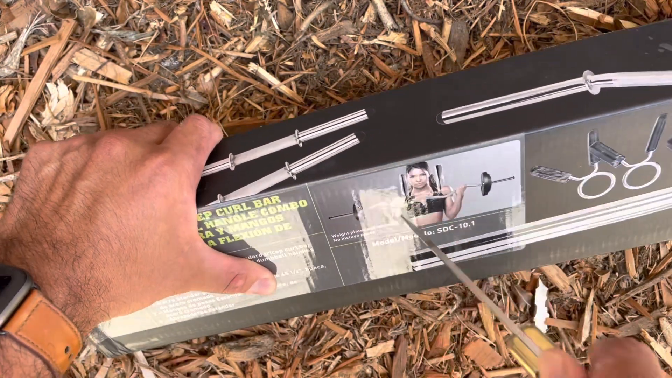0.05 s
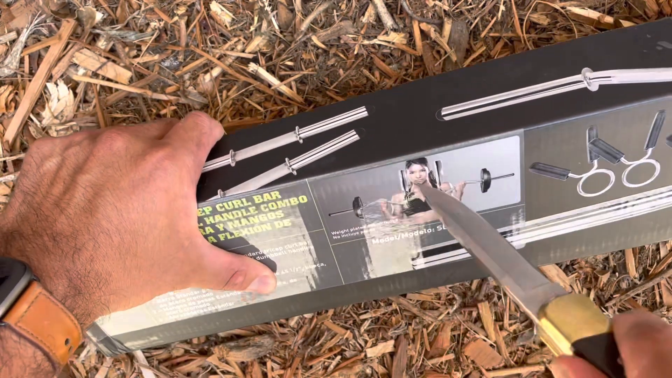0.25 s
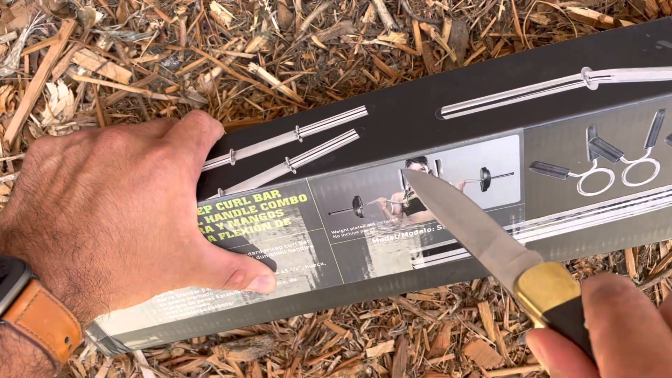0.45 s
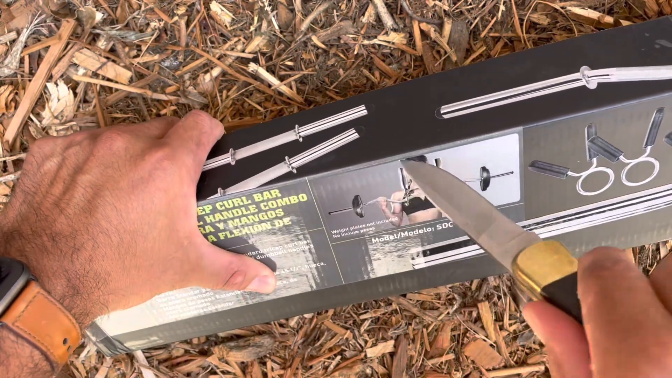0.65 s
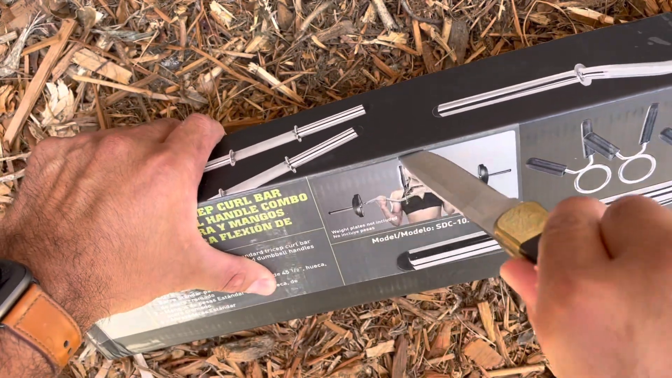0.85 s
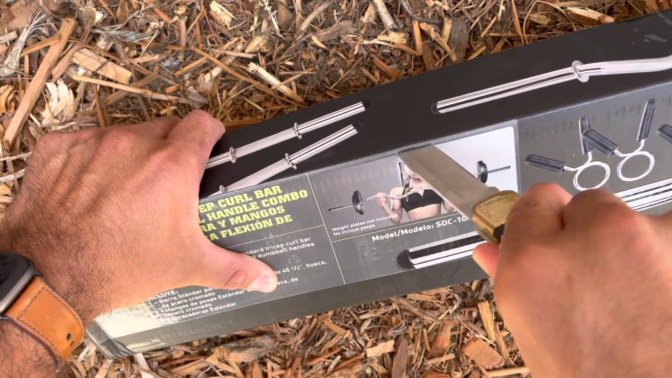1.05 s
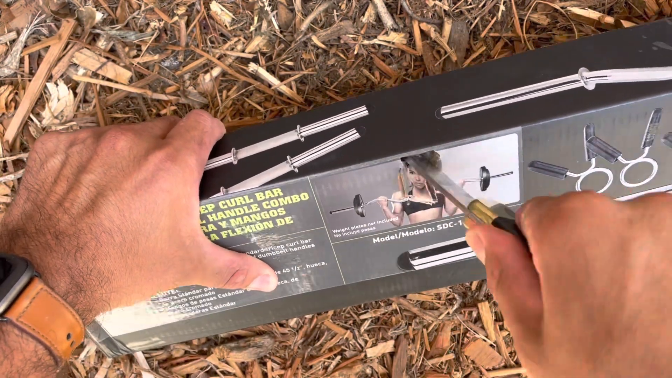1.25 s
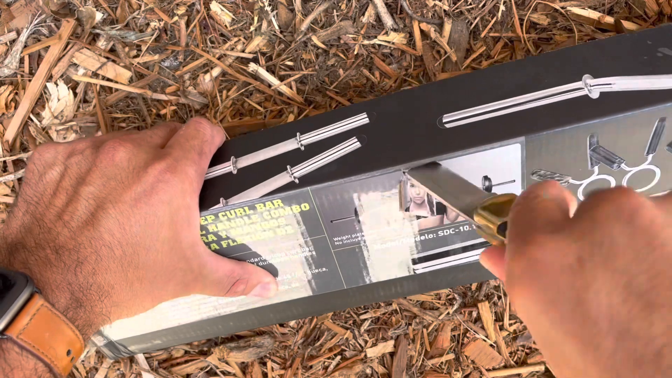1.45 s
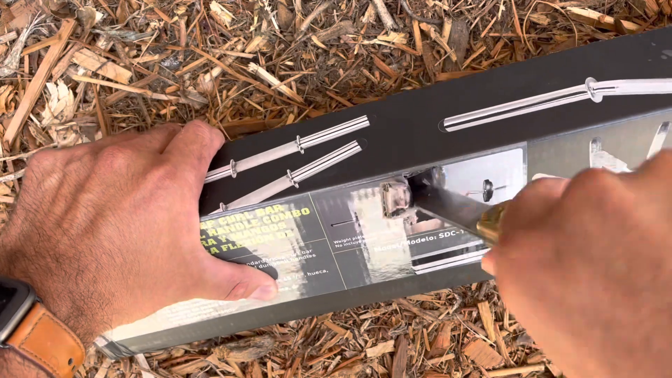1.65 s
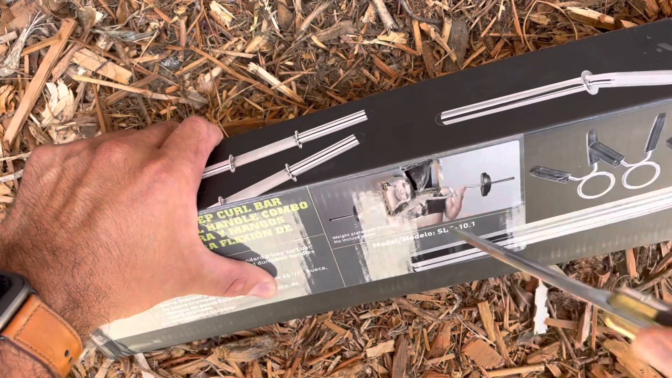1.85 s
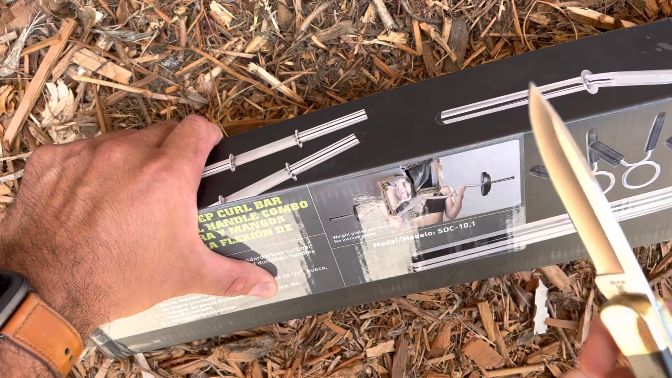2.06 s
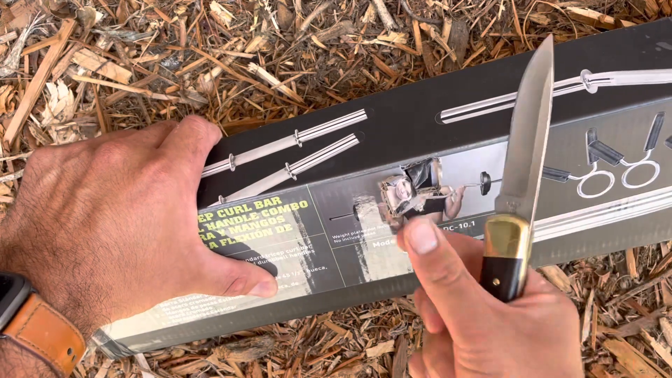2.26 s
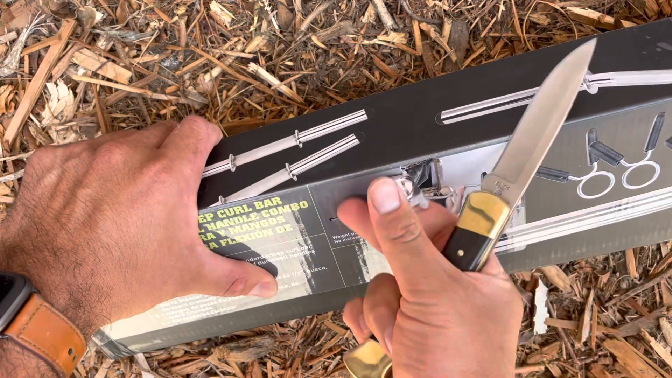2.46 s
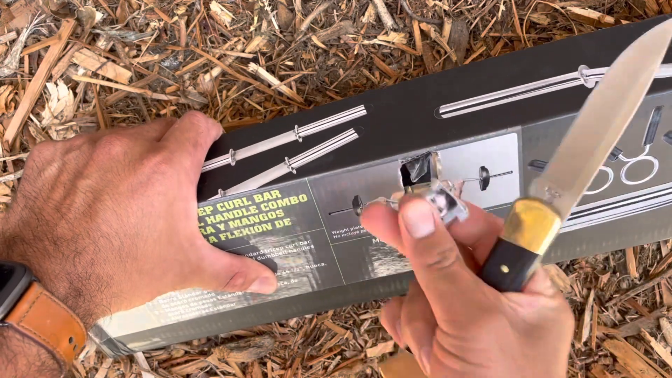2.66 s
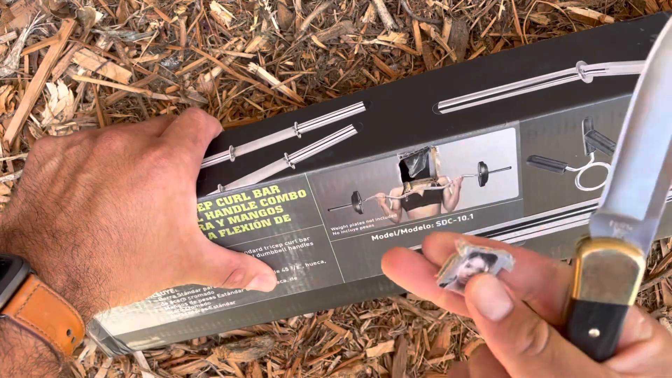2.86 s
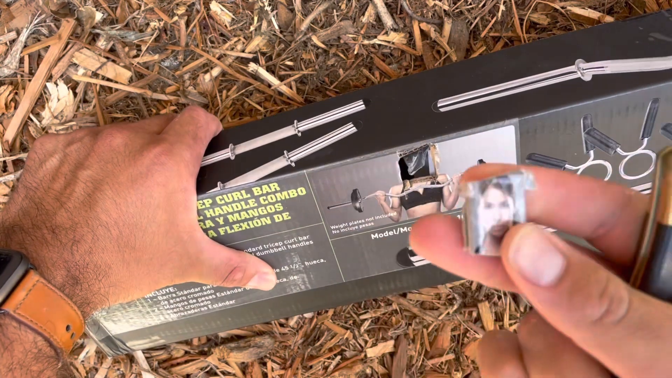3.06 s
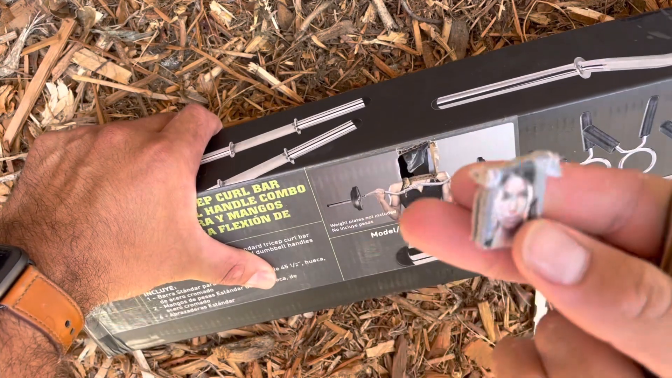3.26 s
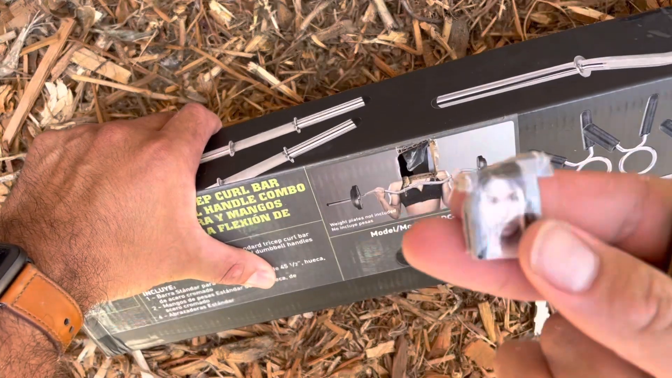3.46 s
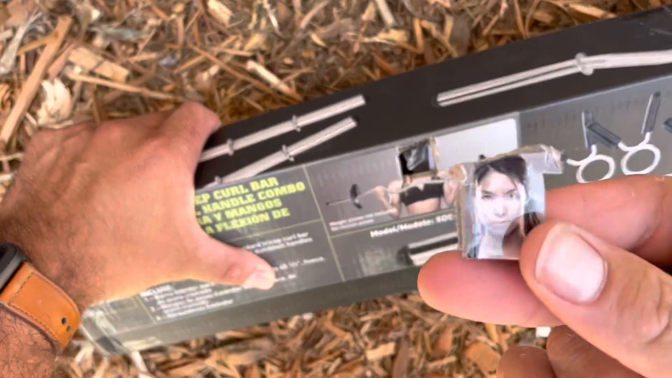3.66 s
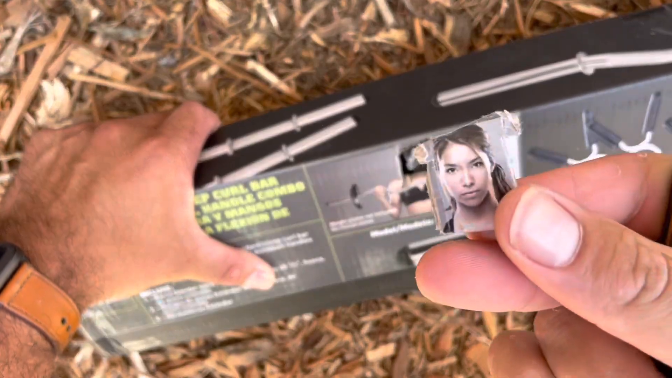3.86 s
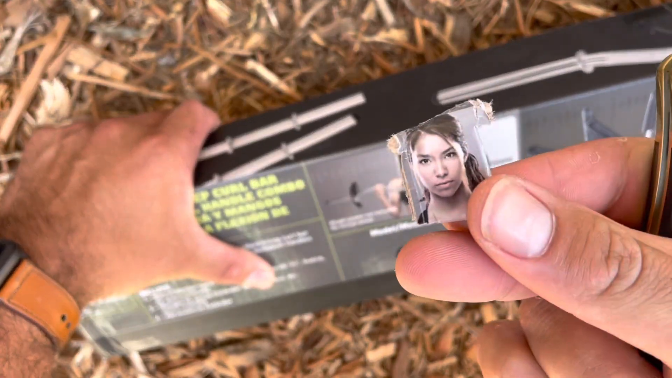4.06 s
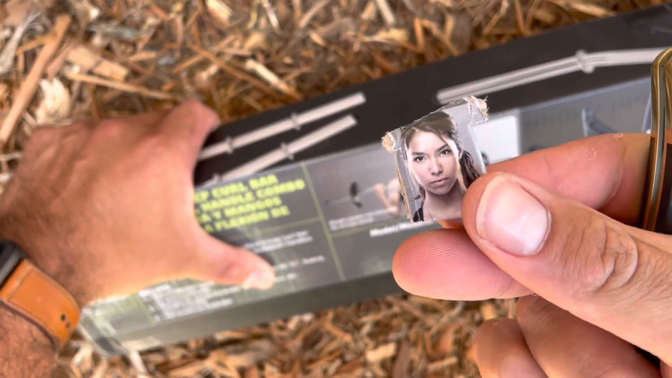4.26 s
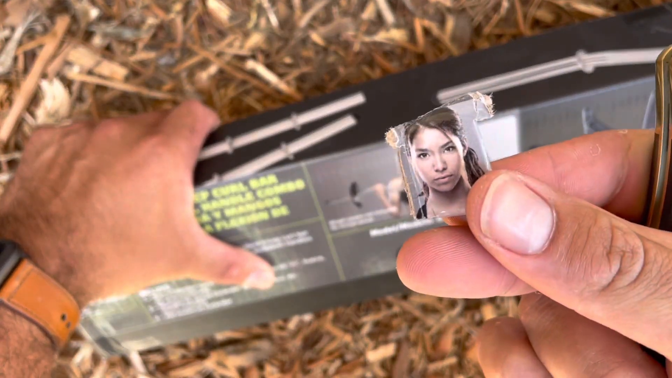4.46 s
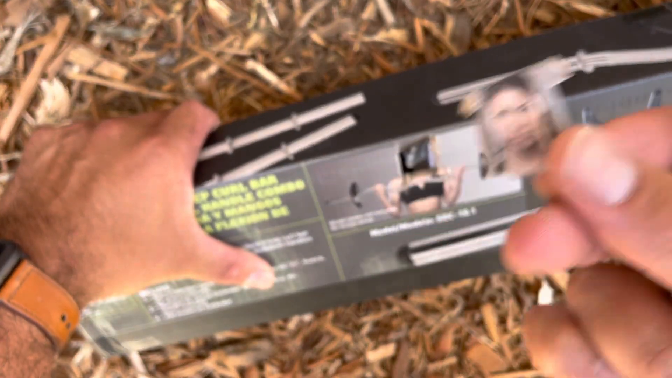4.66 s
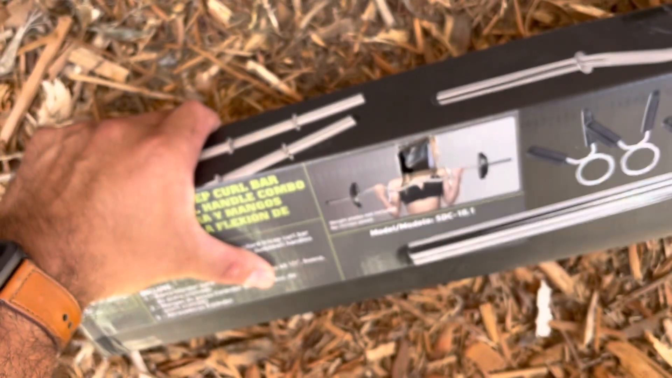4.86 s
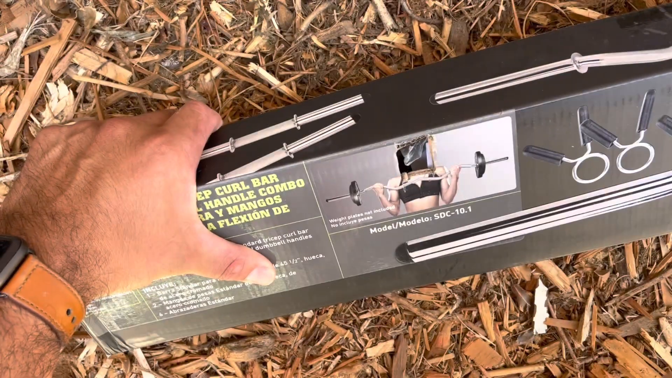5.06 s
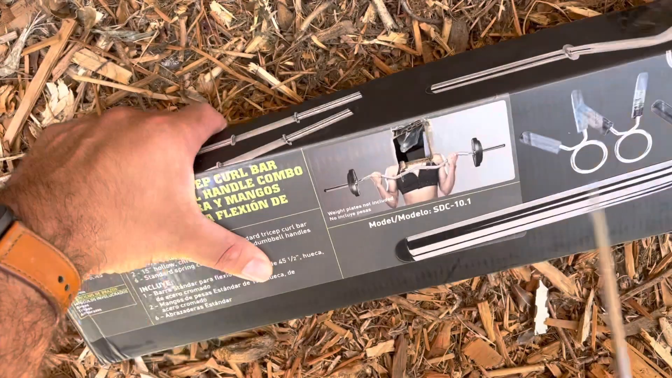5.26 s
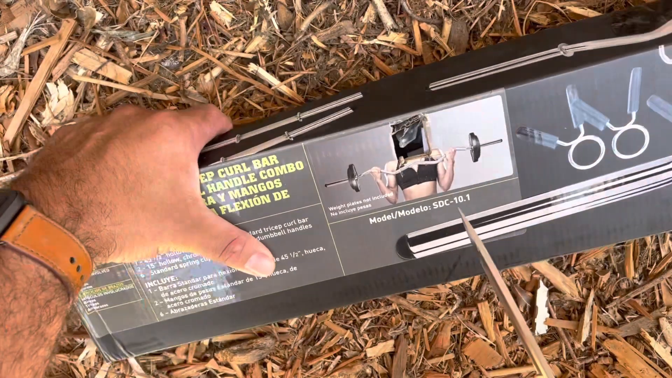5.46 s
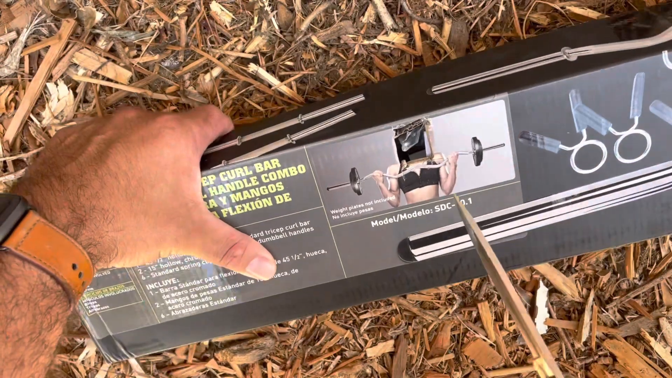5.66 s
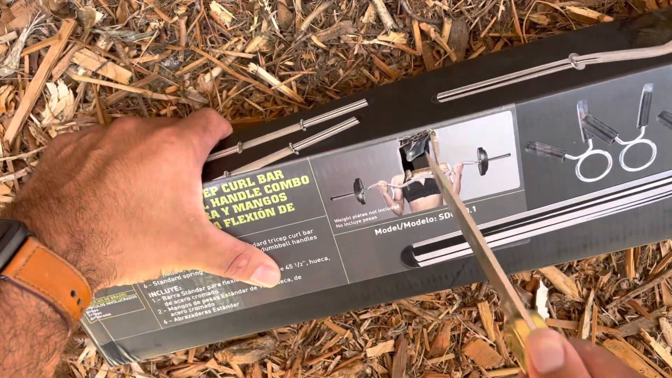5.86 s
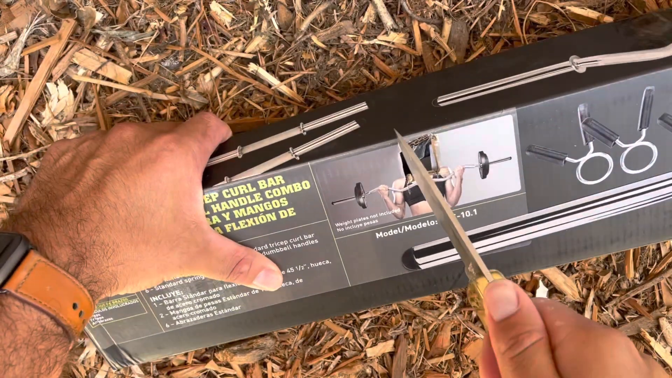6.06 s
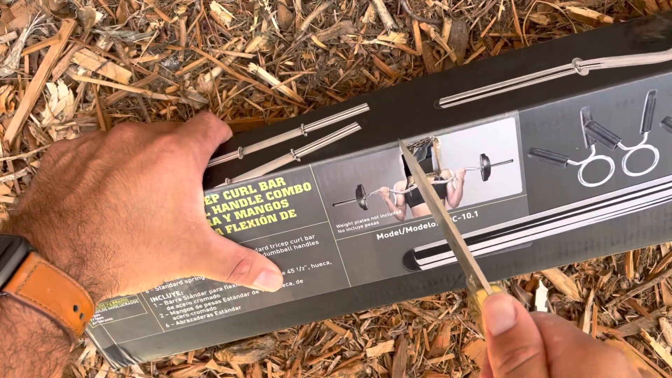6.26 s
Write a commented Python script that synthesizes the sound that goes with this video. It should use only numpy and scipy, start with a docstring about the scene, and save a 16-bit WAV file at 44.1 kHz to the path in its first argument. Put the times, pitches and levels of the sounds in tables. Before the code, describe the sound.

Close, dry cardboard cutting: raspy blade strokes, loud fibre pops and boxy thumps, then a quiet lull with one faint hoarse bird call.

```python
"""Outdoors on wood chips, a folding knife scores and pries a flap out of a hollow cardboard box.
Rubbing is tiny slips of the blade that set box, board, blade and paper fibres ringing; fingers rustle.
Snapping fibres are short noise bursts, and knocks from fingers and handle ring the box's own modes.
Behind them are far traffic made of shaped noise, a machine hum of two wavering tones, and one hoarse
bird call made of pulses sent through throat resonances."""
import sys
import numpy as np
from scipy import signal
from scipy.fft import rfft, irfft, next_fast_len
from scipy.io import wavfile
from scipy.ndimage import uniform_filter1d

SR = 44100
rng = np.random.default_rng(int(sys.argv[2]) if len(sys.argv) > 2 else 0)


def log_audio(samples):
    """Write samples as a 16-bit WAV file to the path given in sys.argv[1]."""
    # one column per channel
    frames = np.atleast_2d(samples).T
    # limit to full scale, then quantise
    limited = np.clip(frames, -1, 1)
    pcm = np.round(limited * 32767).astype(np.int16)
    wavfile.write(sys.argv[1], SR, pcm)


N = 277830

# blade strokes in or against the board; rise and fall each span 20 dB:
# (time of full level [s], rise [s], hold [s], fall [s],
#  box boom [dB], board rasp [dB], blade ring [dB], fibre hiss [dB])
BLADE_STROKES = [(0.0, .005, 0.002, 0.018, -34, -40, -41, -36.5),
                 (0.693, 0.021, 0.035, 0.053, -37.5, -48.5, -69, -51.5),
                 (0.77, 0.035, 0.038, .02, -45, -53.5, -65, -51.5),
                 (0.79, 0.0038, 0.024, 0.05, -32.5, -41, -45, -39.5),
                 (0.826, 0.041, 0.031, 0.057, -36.5, -43, -44, -42.5),
                 (0.985, 0.24, 0.12, 0.029, -37, -44, -45, -45),
                 (1.041, 0.016, 0.021, 0.049, -30.5, -38.5, -42, -34.5),
                 (1.133, 0.013, 0.043, 0.12, -35.5, -42, -40, -40),
                 (1.309, .01, 0.039, 0.03, -69, -77, -56, -53),
                 (1.388, 0.05, 0.064, 0.084, -37, -45, -46, -43),
                 (1.482, 0.095, 0.0068, 0.023, -38.5, -39.5, -36, -39.5),
                 (1.487, 0.0088, 0.036, 0.021, -21.5, -34, -25.5, -27),
                 (1.62, 0.059, 0.036, 0.019, -43, -52, -55.5, -50.5),
                 (1.684, 0.027, 0.0061, 0.02, -45, -49.5, -63, -44.5),
                 (1.693, 0.0039, 0.016, 0.039, -45, -48.5, -54.5, -43),
                 (2.184, 0.0034, 0.0044, 0.059, -32.5, -51.5, -63, -50.5),
                 (2.242, 0.087, 0.018, 0.22, -51, -59, -69.5, -62.5),
                 (4.99, .005, 0.011, 0.062, -52.5, -54.5, -51.5, -67),
                 (5.171, 0.033, 0.012, 0.03, -42.5, -55, -52, -49.5),
                 (5.194, 0.01, 0.052, 0.048, -40, -54, -52.5, -52),
                 (5.25, 0.025, 0.095, 0.21, -50, -59, -63.5, -59.5),
                 (5.691, 0.0038, 0.015, 0.13, -53.5, -56.5, -61.5, -61.5),
                 (5.939, 0.02, 0.008, 0.018, -32, -48, -60, -43),
                 (5.977, 0.023, .005, 0.14, -47.5, -60, -63, -60)]
# fingers sliding on paper and scrap, rise and fall as above:
# (time of full level [s], rise [s], hold [s], fall [s], box boom [dB], fibre hiss [dB])
FINGER_RUSTLES = [(0.05, 0.05, 0.053, 0.026, -57, -63.5), (0.242, .02, 0.013, 0.24, -59, -76),
                  (0.46, 0.012, 0.0036, 0.072, -50, -62), (0.634, 0.045, 0.005, 0.11, -45.5, -53),
                  (1.918, 0.42, 0.031, 0.14, -62, -67.5), (2.402, .1, 0.013, 0.036, -53, -63.5),
                  (2.466, 0.032, 0.0024, 0.022, -38.5, -41.5), (2.524, 0.03, 0.0035, 0.017, -44, -34.5),
                  (2.677, 0.014, 0.0088, 0.15, -75, -56.5), (2.907, 0.017, 0.057, 0.06, -64.5, -61.5),
                  (2.987, .005, 0.012, 0.016, -72.5, -58), (3.035, 0.045, 0.046, 0.01, -73.5, -69.5),
                  (3.455, 0.12, 0.0048, 0.077, -77.5, -69), (3.598, 0.13, 0.005, 0.11, -75, -62.5),
                  (3.828, 0.063, 0.0053, 0.0094, -81, -74.5), (4.523, 0.011, 0.044, .08, -89, -68),
                  (4.67, 0.01, 0.0044, 0.032, -78, -63.5), (4.936, 0.041, 0.0046, 0.041, -71, -72.5),
                  (5.148, 0.23, 0.0063, .01, -58.5, -64), (5.578, 0.17, 0.0054, 0.048, -57, -67.5),
                  (6.207, .03, 0.087, 0.085, -61.5, -65)]
# what a rustle also moves: (board under the boom [dB], blade under the hiss [dB])
RUSTLE_SHARES = [-8.5, -24]
# faint hiss of moving hands between strokes: (time [s], level [dB])
HAND_HISS = [(0.0, -69.5), (0.52, -80.5), (0.95, -104), (1.33, -58.5), (2.02, -87.5), (2.42, -70),
             (4.11, -94), (4.95, -93), (5.16, -74.5), (6.3, -73.5)]
# faint steady murmur: (box level [dB], board level [dB], blade level [dB])
MURMUR = [-65, -82.5, -84.5]

# air and walls of the box: (pitch [Hz], level [dB], time to fall 60 dB [s])
BOX_MODES = [(118, 1, 0.14), (157, 1.5, 0.16), (206, 12, 0.035), (278.7, 10, 0.067), (383, 9.5, 0.03),
             (486.6, 6, 0.053), (621.8, 7.5, 0.027), (778, 5, 0.017), (878, -1.5, 0.099),
             (1143.6, 0, 0.023), (1330, 5, 0.045), (1730, -29.5, 0.056)]
# the board; rubbing doubles the widths, and the levels count in snaps only:
# (pitch [Hz], width [Hz], level [dB])
BOARD_MODES = [(1101, 190, -2.5), (1280, 340, -2.5), (1624, 340, -3), (1900, 100, -10.5), (2160, 120, -6)]
# the blade held in the board; levels count in snaps only: (pitch [Hz], width [Hz], level [dB])
BLADE_MODES = [(2110, 160, 9), (2370, 170, 1.5), (2730, 550, 2), (2783, 140, 3), (3260, 78, 1.5)]
# the paper face; rubbing widens it by a tenth, and the levels count in snaps only:
# (pitch [Hz], width [Hz], level [dB])
FACE_MODES = [(3865, 1800, -2), (4655, 1300, 0), (5720, 1900, 0.5)]
# bright spectrum of tearing fibres: (pitch [Hz], level [dB per Hz])
FIBRE_SPECTRUM = [(3400, -5), (3800, -7.5), (4400, -5.5), (5000, 0.5), (5700, -5), (6800, 0.5), (9000, 2),
                  (12000, -3), (15500, -8.5)]

# box pitch that rubbing favours: (time [s], pitch [Hz])
BOX_FAVOURED = [(0.6, 282), (.72, 275), (.8, 430), (.88, 440), (1.0, 333), (1.4, 352), (1.5, 485),
                (1.7, 452), (2.2, 285), (2.45, 348), (5.15, 448.7), (5.2, 500), (5.26, 264), (6.0, 353)]
# board pitch favoured by where the board is pressed: (time [s], pitch [Hz])
BOARD_FAVOURED = [(0.7, 1120), (.85, 1280), (1.0, 1310), (1.401, 1500), (2.2, 1250), (2.398, 1213),
                  (5.151, 1260), (5.27, 1522), (5.999, 1423)]
# blade pitch favoured, higher the freer the blade stands of the board: (time [s], pitch [Hz])
BLADE_FAVOURED = [(0.7, 3040), (.87, 2960), (1.02, 3200), (1.06, 2880), (1.12, 2670), (1.6, 2562),
                  (4.99, 2300), (5.1, 2437), (5.2, 2290), (5.3, 2090), (5.36, 2410)]
# paper face pitch that rubbing favours: (time [s], pitch [Hz])
FACE_FAVOURED = [(0.6, 5200), (1.0, 5300), (1.5, 5300), (2.3, 5600), (2.5, 4900), (3.0, 5200), (5.2, 5200),
                 (5.4, 4300), (6.0, 5200), (6.22, 4750)]

# fibres snapping; over its length a burst's decay loses about 17 dB:
# (time [s], peak [dB], blade ring [dB], crack over board rasp [dB], length [ms])
FIBRE_SNAPS = [(0.182, -62.5, 14, 2, 2.6), (0.226, -55.5, 3.5, 9, 3.2), (0.46, -45.5, -6, 19, 3.4),
               (0.493, -62, -12.5, -2, 2.2), (0.579, -47.5, -19, 15, 1.7), (0.6344, -33.5, -3, 23, 1.5),
               (0.6628, -33, -4.5, -8, 3.8), (0.689, -52, 1, -5, 2.7), (0.721, -41, -7, 5, 1.5),
               (0.754, -40, -3, 12, 2), (0.761, -45, -2, 12, 2), (0.785, -33, -5, -4, 2.7),
               (1.04, -19, -14, 21, 2.5), (1.0777, -24, 1, 13, 2.2), (1.1114, -8.5, 4.5, 7, 1.4),
               (1.1357, -9.5, -9, 22, 2.2), (1.158, -21.5, 4.5, 11, 1.3), (1.168, -14, -7, 16, 4.2),
               (1.1738, -1, -24, 16.5, 3.5), (1.1754, -6.5, -0.5, 23, 1.6), (1.2066, -6.5, -0.5, 7.5, 0.36),
               (1.2273, -28, -4, 11, 1.1), (1.2536, -8.5, -7, 14, 0.84), (1.289, -21.5, -2.5, 18, 3.1),
               (1.328, -43.5, 4.5, 14, 3), (1.389, -29, 8, 10, 2.9), (1.4041, -27, 4, -1, 1.3),
               (1.434, -13, -34, 10, 0.24), (1.4543, -29, 3, -7, 3.4), (1.4898, -16, -7, -19, 2.7),
               (1.4987, -11, 1.5, 5, 1.3), (1.5077, -33, -12, 17.0, 2.5), (1.517, -21, 9.5, 7.5, 2.7),
               (1.524, -21, -18, -7, 1.3), (1.527, -24, -16.0, 16, 2.9), (1.561, -29.5, 6, -1.5, 2.9),
               (1.62, -19.5, -12.5, 16, 0.63), (1.635, -37, -22, 10, 2.5), (1.6947, -29, -5, 11.5, 5.1),
               (1.733, -37.5, -8, 15, 2.5), (1.892, -48, 1, 6, 1.9), (1.9096, -39.5, -2, 10, 0.63),
               (1.9403, -45, -7, 7.5, 4.5), (2.135, -55.5, 5.5, 6.5, 1.4), (2.182, -23.5, -9.5, -7.5, 0.79),
               (2.434, -35.5, -22, 23, 2.5), (2.448, -45, 1, 11, 3.2), (2.465, -26, -19, 28, 3.1),
               (2.493, -39.5, -14, 26, 2.5), (2.506, -26, -21, 30, 2.5), (2.5261, -29.5, -5.5, 27.5, 1.3),
               (2.805, -51, -6.5, 2, 2.3), (2.988, -44, -35, 16.5, 3.3), (3.168, -66, -28.5, -9.5, 2.4),
               (4.667, -48.5, -22.5, 25, 3.9), (4.929, -50.5, -26.5, 9, 2.3), (4.9952, -20, -3.5, -17, 1),
               (5.069, -44, -35, 16, 4.9), (5.1322, -49, -6, 5, 2.5), (5.16, -36.5, 0, 4, 4.3),
               (5.177, -38.5, -2, 1, 2.1), (5.184, -43, -10, 14, 2), (5.197, -42, 2, 3, 2.7),
               (5.229, -33, -6, 14, 1.7), (5.25, -48, -5, 5, 2), (5.272, -48, -10, -4, 2.7),
               (5.224, -34, -15, 11, 1.3), (5.341, -44, -1.5, 17, 5.1), (5.5573, -46.5, -1, 8.5, 2.9),
               (5.574, -44, -22, 12.5, 2.5), (5.663, -48, -0.5, -3, 1.75), (5.686, -32.5, -12.5, 13, 2.1),
               (5.795, -57.5, 8, -11, 2), (5.87, -49.5, -3, 6, 3.3), (5.899, -39.5, -2.5, 4.5, 1.8),
               (5.937, -32, -16, 2.5, 0.74), (5.995, -43, -16, 4, 4.6), (6.112, -61.5, -4, 2, 1.85),
               (6.154, -58.5, -13, 11, 2), (6.271, -46, -20, 9, 2.8), (6.288, -50, -2, 10, 2)]
# dull knocks on the box:
# (time [s], peak [dB], centre pitch [Hz], contact [ms], freedom to ring [0-1])
BOX_KNOCKS = [(0.46, -32, 125, 0.22, 0.33), (1.0388, -12, 1180, 0.4, 0.43), (1.043, -26, 502.6, 0.4, 0.4),
              (1.062, -23, 605.2, 0.83, 0.2), (1.0422, -9, 110, 1.6, 0.22), (1.113, -21, 436.2, 0.36, 0.36),
              (1.175, -10, 299.5, 1.2, 0.61), (1.178, -13, 558.4, 0.26, 0.52),
              (1.21, -21.5, 282, 0.83, 0.32), (1.257, -21.5, 268.5, 0.92, 1), (1.492, -17, 238, 5.1, 0.83),
              (1.5, -14, 215, 0.51, 0.67), (1.5205, -14, 688, 0.46, 1), (1.5255, -9.5, 700, 0.51, 1),
              (1.527, -14.5, 129, 1.1, 0.8), (1.563, -16, 167.2, 0.76, 0.23),
              (1.695, -22.5, 737, 0.43, 0.67), (1.696, -24.5, 272, 1.07, 0.46),
              (2.182, -25.5, 104, 0.6, 0.86), (2.183, -11, 288, 1.36, 0.4), (4.9937, -22.5, 1310, 0.24, 1),
              (4.9952, -26, 636, 0.52, 1), (4.9953, -26, 374, 0.42, 0.43), (5.194, -55, 580, .6, 0.7),
              (5.936, -18.5, 297, 0.63, 1), (5.94, -15, 180, 1.37, 0.52)]

# near sound at the two microphone ports: (pitch [Hz], right's lead over left [half turns])
PORT_LEAD_CURVE = [(1000, -.05), (2200, -.1), (3200, -.3), (4500, -.05), (5800, 0), (6600, 1), (8100, 1.03),
                   (10000, 1.98), (11700, 2), (14000, 3), (16000, 3.05)]
# near sound at the two ports: (pitch [Hz], left over right [dB])
PORT_BALANCE_CURVE = [(150, -2.5), (400, -1), (900, 1), (2500, 0.5), (5500, 3), (7000, 0)]

# the bird's call: (time [s], pitch [Hz], level [dB])
BIRD_CALL = [(3.16, 316, -86), (3.21, 320, -70), (3.26, 326, -65.5), (3.30, 346, -64.5), (3.36, 351, -60.5),
             (3.41, 353, -60.5), (3.46, 362, -62), (3.51, 361, -63.5), (3.57, 354, -65), (3.66, 352, -78)]
# resonances of the bird's throat: (pitch [Hz], width [Hz], level [dB])
BIRD_THROAT = [(1450, 300, -6), (1770, 220, 4), (2130, 350, 0), (2500, 300, -8)]
# spectrum of the far traffic: (pitch [Hz], level [dB per Hz])
TRAFFIC_SPECTRUM = [(20, -35.5), (35, -33), (55, 3.5), (85, -9), (118, -2.5), (175, -17.5), (250, -19.5),
                    (500, -35), (700, -27.5), (1000, -39), (1290, -33), (1600, -48), (2800, -53),
                    (3400, -66), (6000, -64), (9000, -86.5)]
# the machine's tones: (pitch [Hz], level [dB])
HUM_TONES = [(58, -50.5), (118, -59.5)]
# how alike a far sound is left and right: (pitch [Hz], likeness [-1 to 1])
FAR_LIKENESS = [(40, 0.96), (90, 0.93), (180, 0.95), (550, -0.6), (1650, 0.14), (4970, 0.22), (15000, 0.7)]

GRAINS_PER_S, GRAIN_SPREAD_DB = 3200, 1   # typical rate of the slips; spread of their sizes
RUB_WIDTH_DB = -11.5   # the rubbed patch is wide: this part differs between the ports
FACE_DB = -2   # resonant paper face against the broad hiss
UNEVEN_DB, UNEVEN_HZ = 1.58, 36.0   # each body takes the slips unevenly
WANDER_DB, WANDER_HZ = 3, 25.0   # each mode swells and sinks on its own as the contact shifts
SNAP_WIDTH_DB = -9   # part of a snap that differs between the ports
FIRST_BREAK = 5.0   # first fibre to part, in multiples of the burst's noise before its swell
CRACK_SHIFT_S = .0006   # lines the crack up with the onset of board and blade
CRACK_FACE_DB, SIZZLE_DB = 1, -6   # paper face in a crack; top of a snap under its crack
KNOCK_WIDTH_DB = 1.2   # spread of a mode's balance per octave above the lowest: + left, - right
TRAFFIC_DB = -42
CUTOFF_HZ = 16600


def rub():
    """The same tiny slips drive the box, the board, the blade and the fibres."""
    boom_gain, rasp_gain, ring_gain, hiss_gain = rub_gains()
    middle = grains(smooth=0.47)
    edge = amp(RUB_WIDTH_DB) * grains(smooth=1.0)
    # only the duller part differs between the ports
    edge = signal.lfilter([.7], [1, -.3], edge)
    slips = np.array([middle + edge, middle - edge])

    wide_board = [(hz, 2 * width, db) for hz, width, db in BOARD_MODES]
    wide_face = [(hz, 1.1 * width, db) for hz, width, db in FACE_MODES]
    face = favoured(slips, wide_face, FACE_FAVOURED, 80.0, least_db=-9.5)
    boom = box_boom(slips)
    rasp = favoured(slips, wide_board, BOARD_FAVOURED, 50.0, least_db=-12.5)
    blade = favoured(slips, BLADE_MODES, BLADE_FAVOURED, 150.0, least_db=-11)
    hiss = rms_one(rms_one(fibre_colour(slips)) + amp(FACE_DB) * face)
    return boom_gain * boom + rasp_gain * rasp + ring_gain * blade + hiss_gain * hiss


def grains(smooth):
    """Tiny uneven slips come in clumps, over smooth friction noise."""
    sizes = amp(GRAIN_SPREAD_DB * np.minimum(rng.exponential(1, N), 5)) * rng.choice([-1, 1], N)
    born = rng.random(N) < GRAINS_PER_S * amp(4 * drift(30)) / SR
    return rms_one(sizes * born) + smooth * rng.standard_normal(N)


def box_boom(slips):
    """Slips ring the middle modes of the box, strongest near the pitch favoured at that moment."""
    favoured_hz, = in_time(BOX_FAVOURED)
    boom, power = 0, 0
    for k, (hz, level_db, t60) in enumerate(BOX_MODES[2:10]):
        share = amp(level_db - 5.0 * np.log2(hz / favoured_hz) ** 2) * np.sqrt(t60)
        boom = boom + (-1) ** k * share * rms_one(ring(slips, hz, t60))
        power = power + share ** 2
    return boom / np.sqrt(power)


def favoured(slips, modes, pitch, narrowness, least_db):
    """Modes ring more the nearer the favoured pitch, with wandering shares; none falls silent."""
    favoured_hz, = in_time(pitch)
    rings, power = 0, 0
    for mode in modes:
        nearness_db = -narrowness * np.log2(mode[0] / favoured_hz) ** 2
        weight = amp(np.maximum(nearness_db, least_db) + WANDER_DB * drift(WANDER_HZ))
        rings = rings + weight * rms_one(resonate(resonate(slips, [mode]), [mode]))
        power = power + weight ** 2
    return rings / np.sqrt(uniform_filter1d(power, size=4000))


def rub_gains():
    """Loudness of box, board, blade and fibres: strokes, rustles and faint sound add as powers."""
    cuts = np.transpose(BLADE_STROKES)
    *rustle_times, boom_db, hiss_db = np.transpose(FINGER_RUSTLES)
    rustle_db = [boom_db, boom_db + RUSTLE_SHARES[0], hiss_db + RUSTLE_SHARES[1], hiss_db]
    power = amp(cuts[4:]) ** 2 @ strokes(*cuts[:4]) + amp(rustle_db) ** 2 @ strokes(*rustle_times)
    faint_db = [*MURMUR, *in_time(HAND_HISS)]
    steps = np.arange(N) / 16   # the envelopes have one value every 16 samples
    gains = []
    for p, db in zip(power, faint_db):
        steady = np.sqrt(np.interp(steps, np.arange(len(p)), p) + amp(db) ** 2)
        gains.append(steady * amp(UNEVEN_DB * drift(UNEVEN_HZ)))
    return gains


def strokes(s, rise, hold, fall):
    """Each stroke's power swells, holds and fades in straight lines of dB."""
    t = np.arange(0, N + 16, 16) / SR - s[:, None]
    up = t / np.maximum(rise, .002)[:, None]
    down = (np.abs(hold)[:, None] - t) / np.maximum(fall, .002)[:, None]
    return amp(2 * 20 * np.clip(np.minimum(up, down), -6, 0))   # the 2 turns gain into power


def snaps():
    """Each snap is a sharp, dying noise burst that rings board and blade and cracks in the treble."""
    s, peak_db, blade_db, bright_db, ms = np.transpose(FIBRE_SNAPS)
    t = np.arange(1200) / SR
    swell = (1 - np.exp(-t / 0.00039)) * np.exp(-t * 2000 / np.maximum(ms, .3)[:, None])
    middle, edge = np.moveaxis(rng.standard_normal((len(s), 2, 1200)), 1, 0) * swell
    middle[:, round(CRACK_SHIFT_S * SR / 2)] += FIRST_BREAK
    bursts = middle[:, None] + amp(SNAP_WIDTH_DB) * edge[:, None] * [[1], [-1]]

    board = focus(bursts, BOARD_MODES, 730, 2000)
    favoured_hz = np.interp(s, *np.transpose(BLADE_FAVOURED))[:, None, None]
    blade = 0
    for k, mode in enumerate(BLADE_MODES):
        nearness = amp(-110.0 * np.log2(mode[0] / favoured_hz) ** 2)
        blade = blade + (-1) ** k * nearness * focus(bursts, [mode], 2300, 3800)
    # the paper face colours the crack
    fibres = fibre_colour(bursts + amp(CRACK_FACE_DB) * resonate(bursts, FACE_MODES))
    fibres = np.roll(fibres, round(CRACK_SHIFT_S * SR), axis=-1)
    crack = signal.sosfilt(signal.butter(4, 7000, "low", fs=SR, output="sos"), fibres)
    sizzle = signal.sosfilt(signal.butter(4, 7000, "high", fs=SR, output="sos"), fibres)

    crack_db = np.minimum(bright_db, 0)
    shares_db = [np.minimum(-bright_db, 0), blade_db, crack_db, crack_db + SIZZLE_DB]
    out = np.zeros((2, N + 1200))
    for part, db in zip([board, blade, crack, sizzle], shares_db):
        part = part / np.abs(part).max(axis=(1, 2), keepdims=True) * amp(peak_db + db)[:, None, None]
        for start, row in zip(s, part):
            out[:, round(start * SR):][:, :1200] += row
    return out[:, :N]


def knocks():
    """A soft push rings box modes near its pitch; a pressing hand damps, a free wall rings on fewer."""
    out, t = np.zeros((2, N + 9000)), np.arange(8000)[:, None] / SR
    hz, level_db, t60 = np.transpose(BOX_MODES)
    signs = (-1) ** np.arange(len(BOX_MODES))
    spread_db = rng.normal(0, 3.0, (len(BOX_KNOCKS), len(BOX_MODES)))
    balance_db = rng.normal(0, KNOCK_WIDTH_DB, spread_db.shape) * np.log2(hz / hz[0])
    for (s, peak_db, centre_hz, ms, free), chance_db, pan_db in zip(BOX_KNOCKS, spread_db, balance_db):
        distance_db = (6.5 + 12.0 * free ** 2) * np.log2(hz / centre_hz) ** 2
        strength = amp(level_db + chance_db - distance_db) * signs
        decay = amp(-60 * t / (t60 * np.clip(free, .15, 1.5)))
        rings = np.sin(2 * np.pi * hz * t) * decay @ (strength * amp([pan_db, -pan_db])).T
        # a longer contact makes a duller knock
        push = np.hanning(int(np.clip(ms, .1, 8) * SR / 1000) + 3)
        knock = signal.fftconvolve(rings.T, push[None])
        out[:, round(s * SR):][:, :knock.shape[1]] += amp(peak_db) * knock / np.abs(knock).max()
    # take out the deep bass and any steady offset below the knocks
    return signal.sosfilt(signal.butter(2, 80, "high", fs=SR, output="sos"), out[:, :N])


def fibre_colour(x):
    """Tearing fibres have a bright, broad spectrum."""
    high = signal.sosfilt(signal.butter(4, 3000, "high", fs=SR, output="sos"), x)
    return shape(high, lambda hz: amp(at_hz(FIBRE_SPECTRUM, hz)))


def ground_tail(near):
    """The ground and the box's far end return a short, dull, uneven tail to each port."""
    tail = rng.standard_normal((2, 2000)) * np.exp(-np.arange(2000) / 220)
    tail = signal.lfilter([.5, -.5], [1, -1.4, .45], tail) * amp(-29.5)
    return signal.fftconvolve(near, tail, axes=1)[:, :N]


def ports(near):
    """A near sound reaches the two ports with a phase and level offset that depend on pitch."""
    lead_hz, half_turns = np.transpose(PORT_LEAD_CURVE)

    def half(hz):
        """Each port takes half of the offset."""
        turn = np.exp(-.5j * np.pi * np.interp(hz, lead_hz, half_turns))
        return amp(at_hz(PORT_BALANCE_CURVE, hz) / 2) * turn
    return np.array([shape(near[0], half), shape(near[1], lambda hz: 1 / half(hz))])


def bird():
    """Unsteady pulses pass through throat resonances and are blurred by far echoes."""
    pitch_hz, level_db = in_time(BIRD_CALL)
    turns = np.cumsum(pitch_hz * (1 + .017 * drift(70))) / SR
    pulses = np.diff(np.floor(turns), prepend=0) * amp(3.5 * drift(25))
    pulses = pulses + .05 * rng.standard_normal(N)   # a little noise between the pulses
    voice = resonate(resonate(pulses, BIRD_THROAT), [(2000, 1400, 0)])
    call = amp(level_db) * rms_one(voice)
    echoes = rng.standard_normal((2, 3000)) * np.exp(-np.arange(3000) / 400)
    echoes[:, 0] = 14   # the direct path
    echoes = echoes / np.linalg.norm(echoes, axis=1, keepdims=True)
    return signal.fftconvolve(call[None], echoes, axes=1)[:, :N]


def background():
    """Traffic rumble swells slowly, with a machine's wavering hum and a tone about an octave above."""
    mid, side = (traffic(noise) for noise in rng.standard_normal((2, N)))
    for hz, level_db in HUM_TONES:
        turns = np.cumsum(hz * (1 + 0.034 * drift(7.4))) / SR
        mid = mid + amp(level_db + 1.2 * drift(1.4)) * np.sin(2 * np.pi * turns)
    return diffuse(mid, side)


def traffic(noise):
    """Far traffic is noise with a deep spectrum and a slowly drifting level."""
    level = amp(TRAFFIC_DB + 0.71 * drift(2.5))
    return level * rms_one(shape(noise, lambda hz: amp(at_hz(TRAFFIC_SPECTRUM, hz))))


def diffuse(mid, side):
    """Far sound is alike left and right in the bass, mostly unlike above."""
    alike = lambda hz: np.clip(at_hz(FAR_LIKENESS, hz), -.98, .98)
    mid = shape(mid, lambda hz: np.sqrt(1 + alike(hz)))
    side = shape(side, lambda hz: np.sqrt(1 - alike(hz)))
    return np.array([mid + side, mid - side]) / np.sqrt(2) * amp([[-1.3], [1.3]])


def amp(db):
    """Gain of a level in dB."""
    return 10 ** (np.asarray(db) / 20)


def rms_one(x):
    """Scale to an average strength (rms) of 1."""
    return x / np.sqrt(np.mean(x ** 2) + 1e-20)


def in_time(rows):
    """Turn table columns into curves with one value a sample."""
    s, *columns = np.transpose(rows)
    return [np.interp(np.arange(N) / SR, s, c) for c in columns]


def at_hz(points, hz):
    """Read a (pitch [Hz], value) table along a log pitch axis."""
    table_hz, values = np.array(points).T
    return np.interp(np.log(hz + 1), np.log(table_hz), values)


def shape(x, response):
    """Filter by a function of frequency."""
    length = x.shape[-1]
    size = next_fast_len(length + 4096)
    hz = np.arange(size // 2 + 1) * SR / size
    return irfft(rfft(x, size) * response(hz), size)[..., :length]


def drift(rate):
    """Slow random wander with spread 1; rate in Hz sets how fast."""
    r = np.exp(-80 * np.pi * rate / SR)   # one step every 40 samples
    noise = rng.standard_normal(N // 40 + 2002)
    slow = signal.lfilter([1], [1, -2 * r, r * r], noise)[2000:]
    return np.interp(np.arange(N) / 40, np.arange(len(slow)), rms_one(slow))


def resonate(x, modes):
    """Resonances side by side, with alternating sign."""
    out = 0
    for k, (hz, width, level_db) in enumerate(modes):
        r = np.exp(-np.pi * width / SR)
        b = (1 - r * r) / 2 * np.array([1, 0, -1])
        a = [1, -2 * r * np.cos(2 * np.pi * hz / SR), r * r]
        out = out + (-1) ** k * amp(level_db) * signal.lfilter(b, a, x)
    return out


def ring(x, hz, t60):
    """A unit click sets a dying sine ringing from height 1."""
    r, w = amp(-60 / (t60 * SR)), 2 * np.pi * hz / SR
    return signal.lfilter([0, np.sin(w)], [1, -2 * r * np.cos(w), r * r], x + 1e-18)


def focus(x, modes, low_hz, high_hz):
    """Resonances with dark valleys on either side."""
    band = signal.butter(2, [low_hz, high_hz], "band", fs=SR, output="sos")
    return signal.sosfilt(band, resonate(x, modes))


def scene():
    """Hands, knife and box are close by; traffic, hum and bird are far off."""
    near = rub() + knocks() + snaps()
    return ports(near) + ground_tail(near) + background() + bird()


def record(dry):
    """The lowest bass is cut, the loudest peaks are rounded, the top is cut."""
    low_cut = signal.sosfilt(signal.butter(2, 22, "high", fs=SR, output="sos"), dry)
    rounded = .9 * np.tanh(low_cut / .9)
    return signal.sosfilt(signal.cheby2(12, 60, CUTOFF_HZ, fs=SR, output="sos"), rounded)


dry = scene()
out = record(dry)
log_audio(out)
```